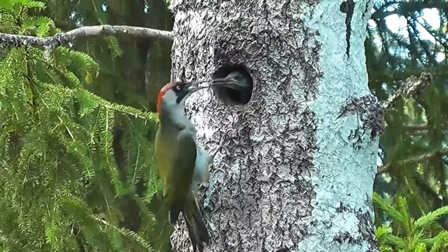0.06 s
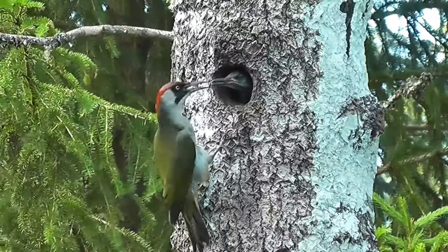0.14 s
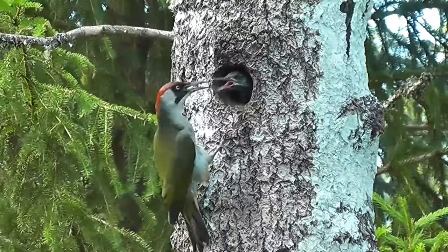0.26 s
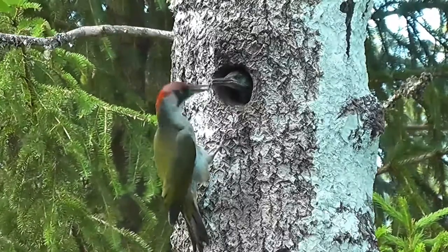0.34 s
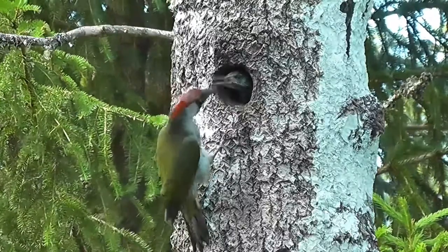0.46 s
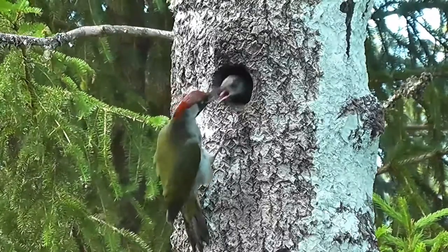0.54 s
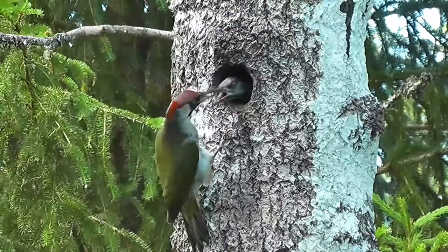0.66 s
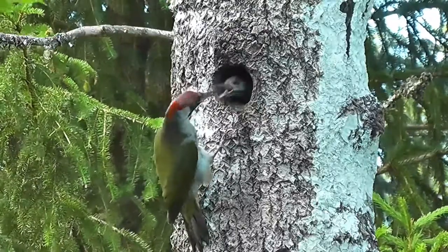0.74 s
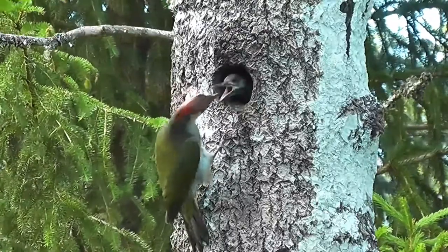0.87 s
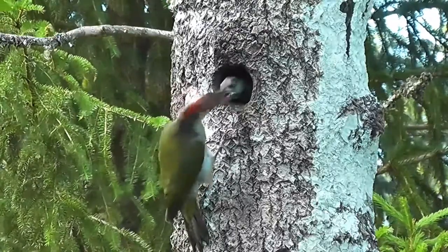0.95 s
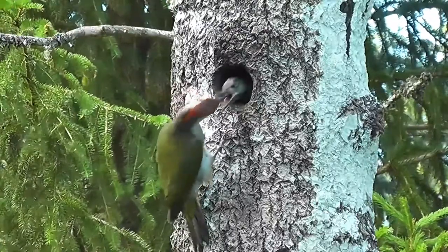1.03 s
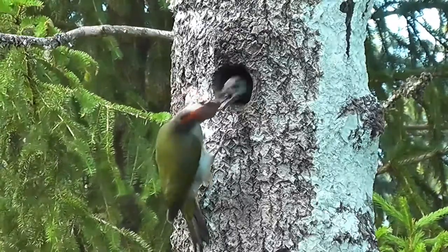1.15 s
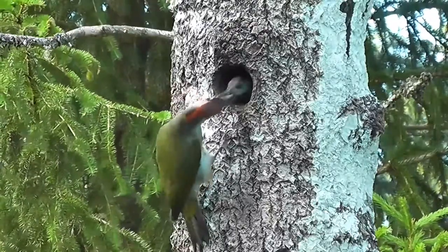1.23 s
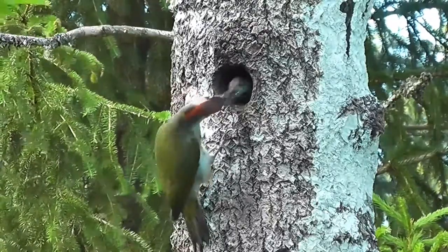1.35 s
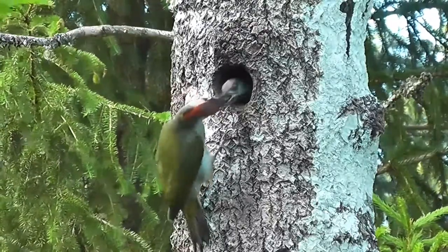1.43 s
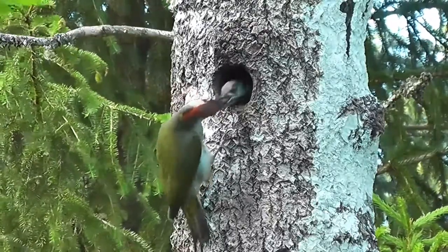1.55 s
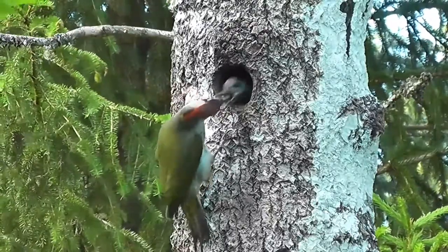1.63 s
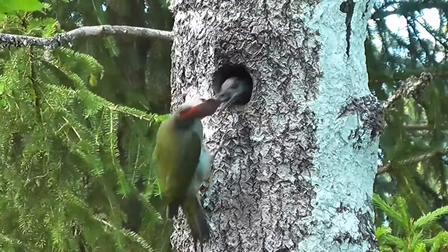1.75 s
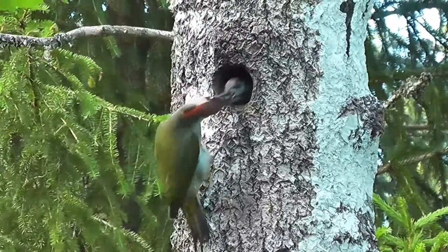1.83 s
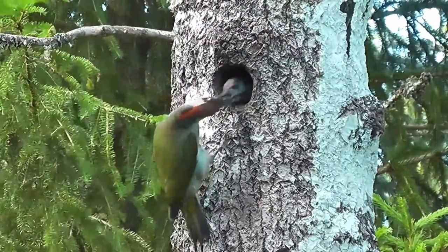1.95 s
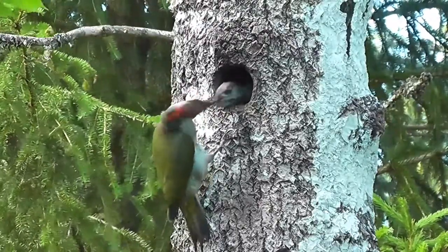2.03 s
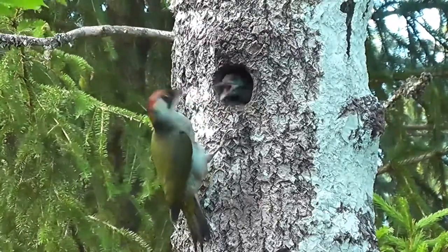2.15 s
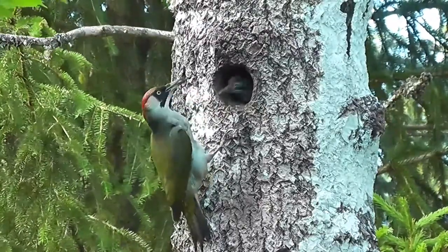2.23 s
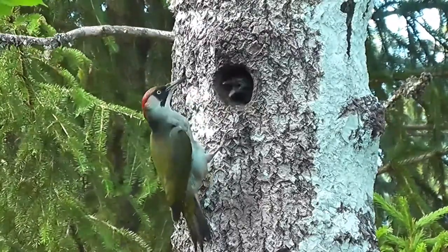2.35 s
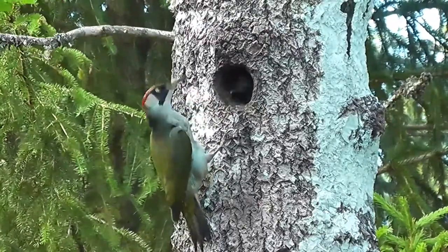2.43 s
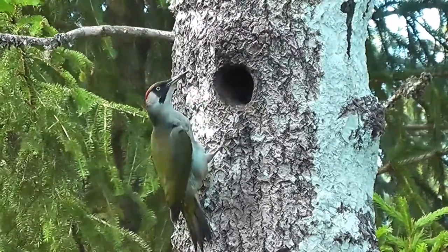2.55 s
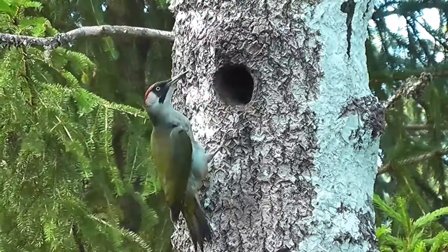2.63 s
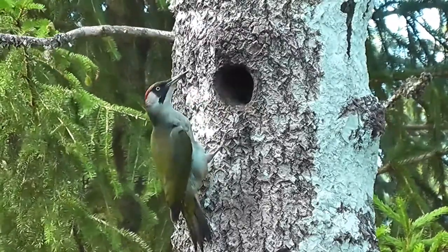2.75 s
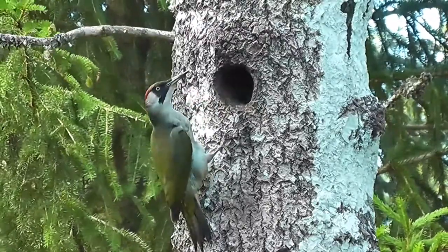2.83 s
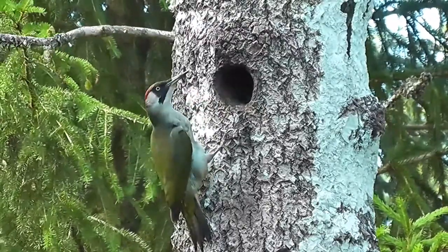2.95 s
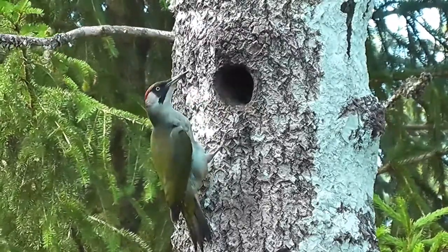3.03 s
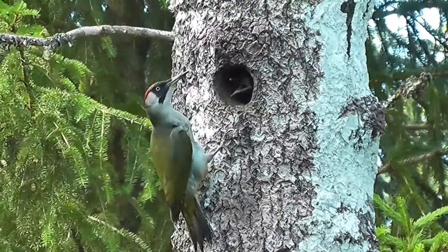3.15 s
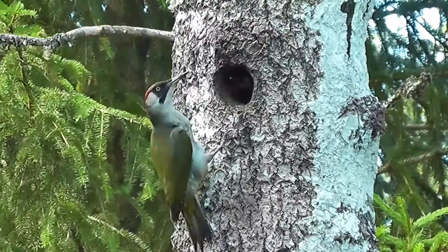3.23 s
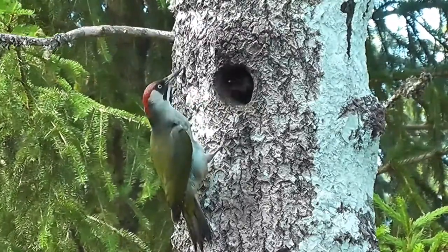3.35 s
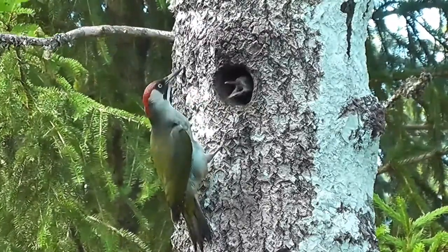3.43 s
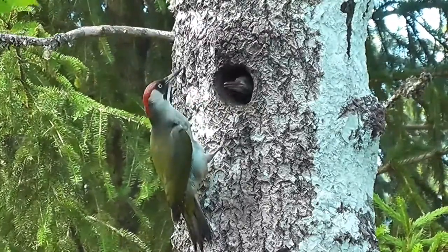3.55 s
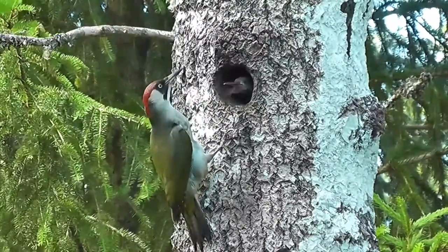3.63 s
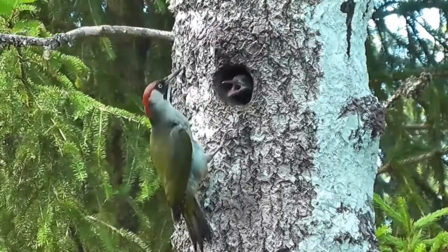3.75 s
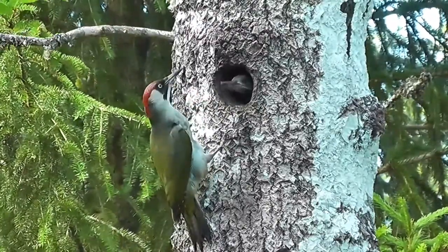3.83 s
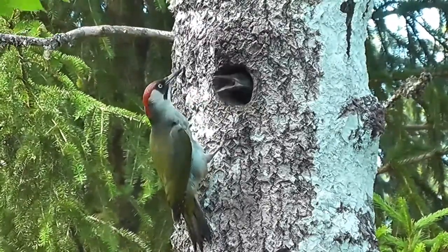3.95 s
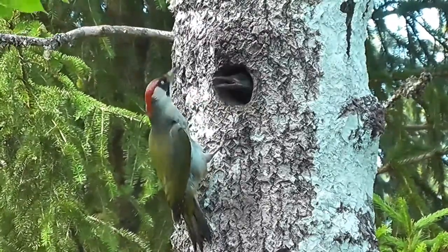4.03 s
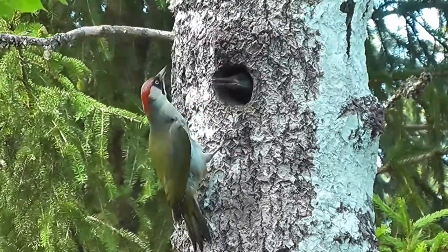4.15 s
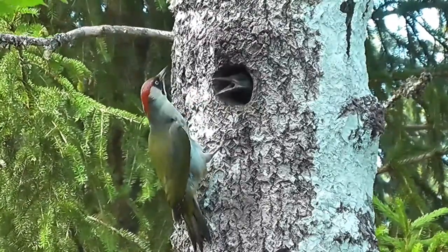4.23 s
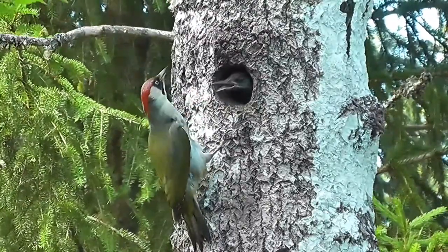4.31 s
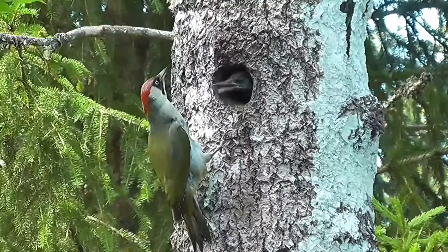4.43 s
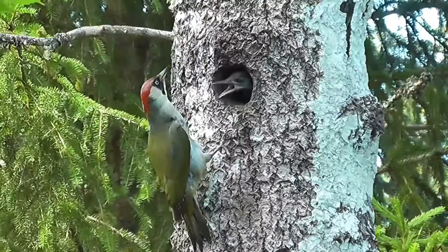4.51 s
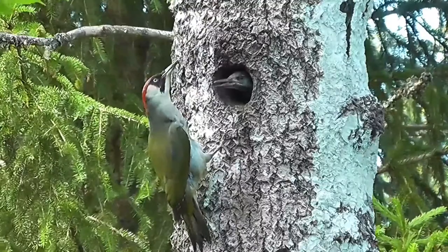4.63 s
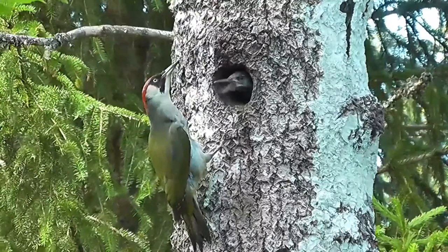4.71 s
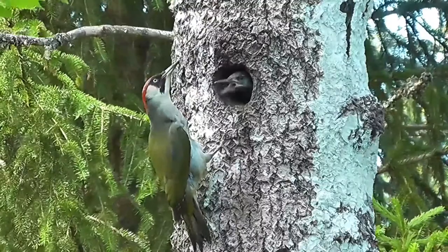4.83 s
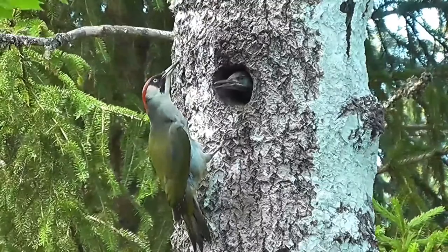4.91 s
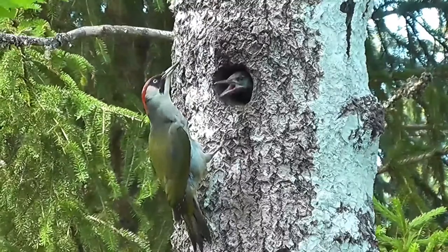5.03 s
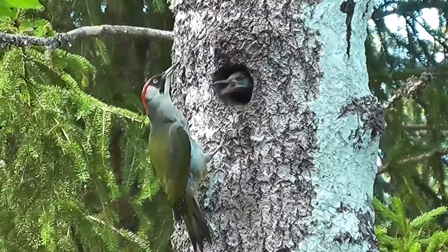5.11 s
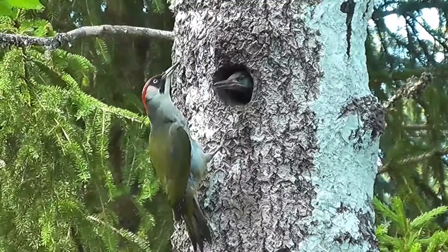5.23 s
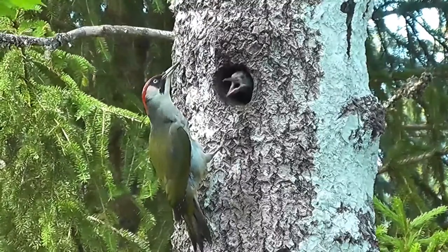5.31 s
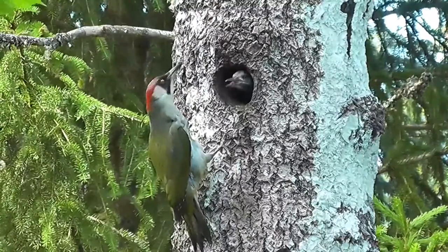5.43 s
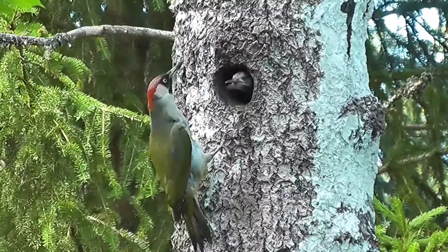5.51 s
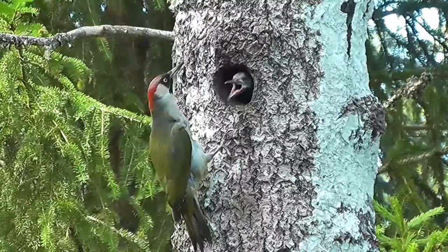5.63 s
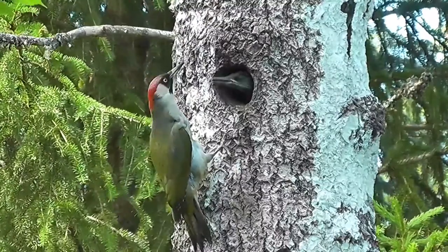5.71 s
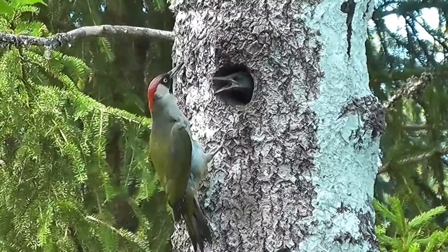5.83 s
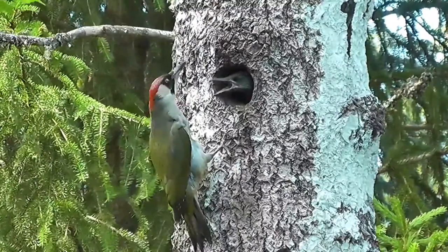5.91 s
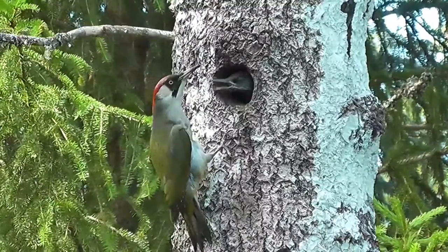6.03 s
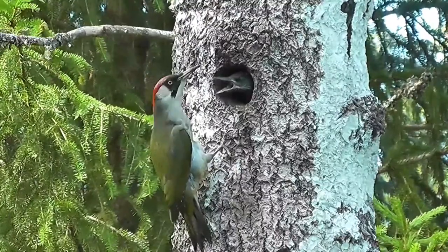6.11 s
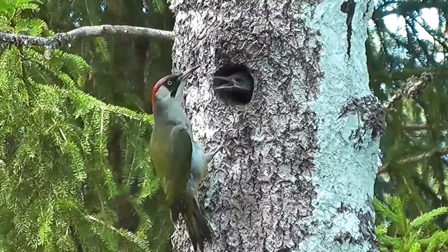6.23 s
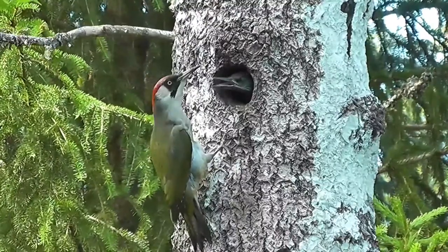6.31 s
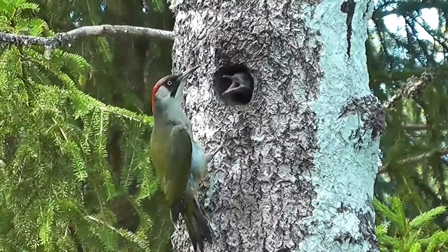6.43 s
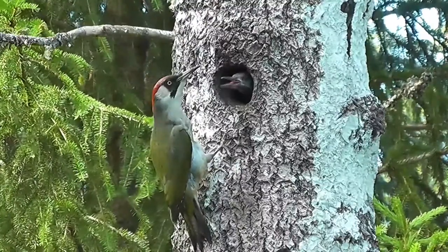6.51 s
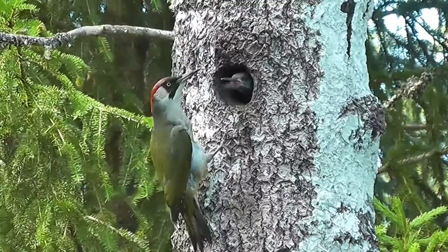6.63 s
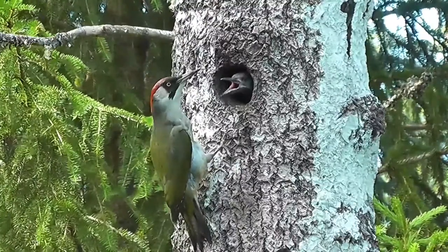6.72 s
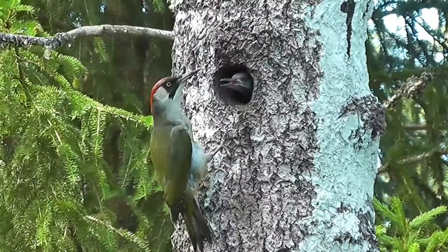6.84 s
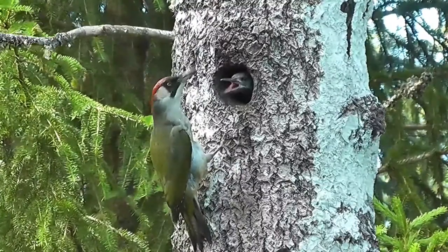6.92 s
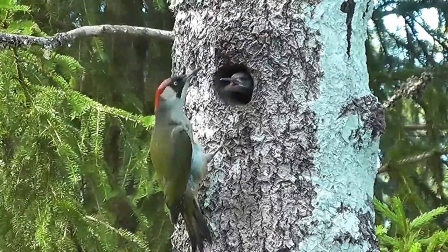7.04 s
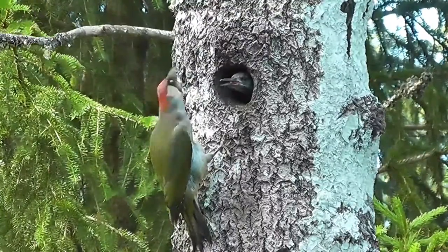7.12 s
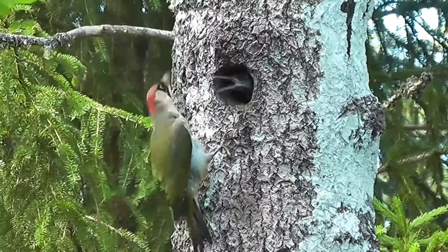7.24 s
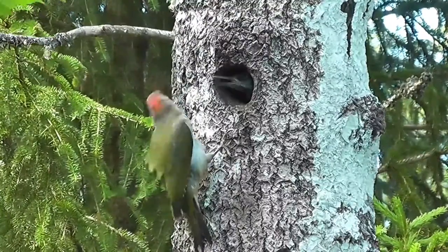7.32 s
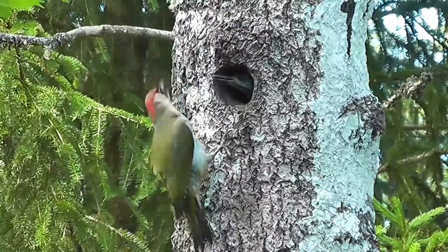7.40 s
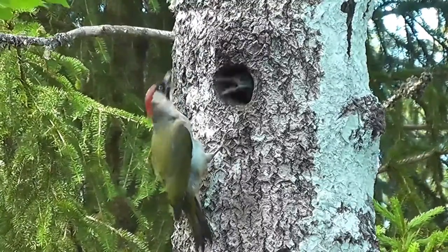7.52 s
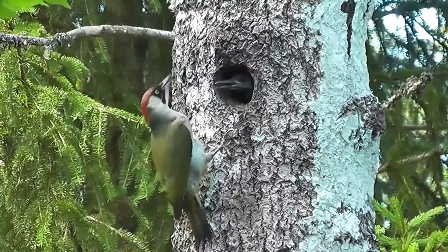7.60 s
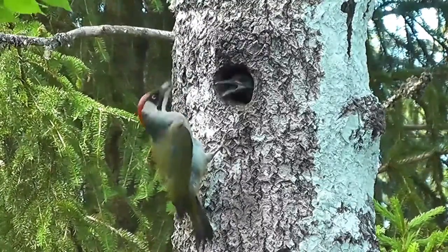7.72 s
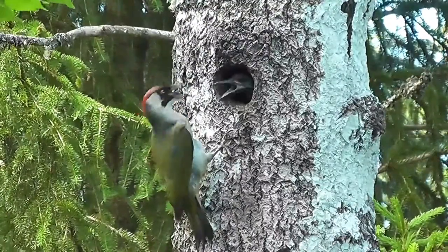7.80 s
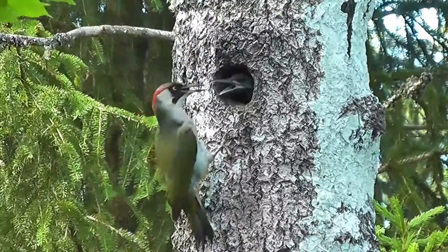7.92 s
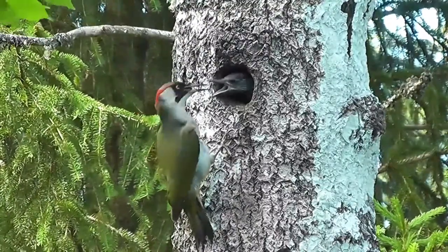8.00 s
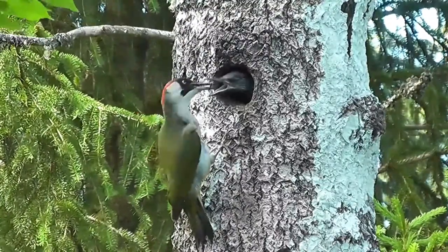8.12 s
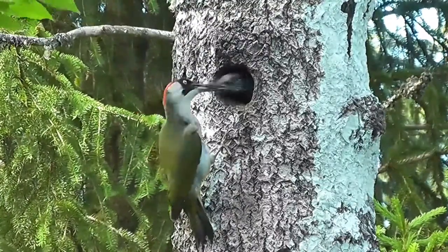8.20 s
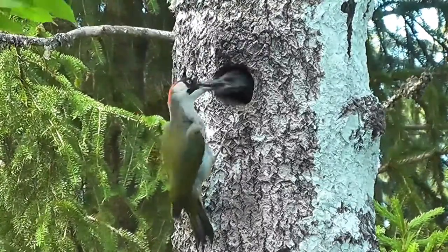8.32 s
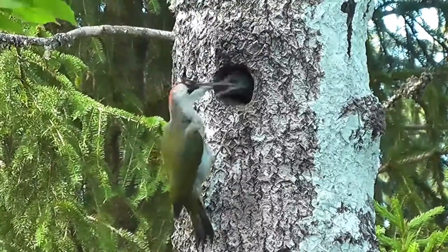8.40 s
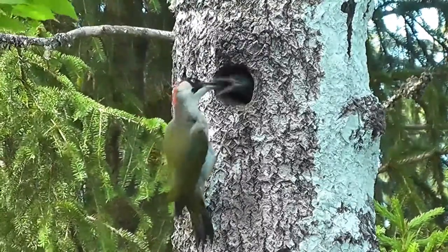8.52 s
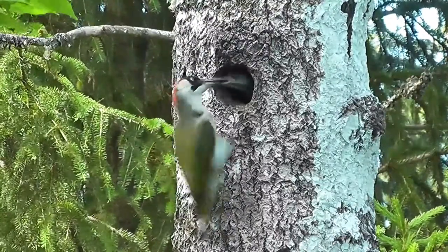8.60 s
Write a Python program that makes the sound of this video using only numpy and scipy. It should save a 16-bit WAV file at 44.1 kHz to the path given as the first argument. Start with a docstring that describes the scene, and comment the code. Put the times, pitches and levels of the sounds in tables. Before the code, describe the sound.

A woodpecker chick begs close by from a hollow tree trunk in a quiet forest. In the first second it gives four harsh calls, each a rough rasp that tightens into a short, falling squeak, with a brief echo from the trees. From about 1 to 2.6 seconds it makes only short, quiet, muffled grunts while being fed. Further off, a small bird gives five thin, very high whistles between 0.2 and 1.9 seconds. At 2.7 seconds the begging resumes and runs evenly at nearly four calls a second, loudest from 3.5 to 7 seconds, then a little weaker and rougher until the end, near 8.7 seconds. Three very faint chirps sound behind it at about 5.4, 6.2 and 7.4 seconds. A soft, even rush of air in distant trees and a faint low hum continue throughout.

```python
"""A green woodpecker nestling begs from its nest hole in a spruce trunk, over soft air and a faint hum.
Four calls open: each a rasp of uneven syrinx pulses that locks into a short, falling squeak, coloured by
the beak and the hollow trunk and echoed by the forest. The chick falls to muffled grunts while it is fed,
and small birds whistle further off. From 2.7 s it begs again, nearly four calls a second, with three
faint chirps behind it in the second half."""
import sys
import numpy as np
from scipy import signal
from scipy.fft import rfft, irfft, next_fast_len
from scipy.io import wavfile
from scipy.ndimage import uniform_filter1d

SR = 44100
rng = np.random.default_rng(int(sys.argv[2]) if len(sys.argv) > 2 else 0)


def put_to_file(sound):
    """Save the sound as 16-bit audio at rate SR, in the file named by the first command-line argument."""
    columns = np.atleast_2d(sound).T  # one column per channel
    safe = np.clip(columns, -1, 1)
    whole_steps = np.round(safe * 32767)
    wavfile.write(sys.argv[1], SR, whole_steps.astype(np.int16))


N = 381906
TIME = np.arange(N) / SR


def undb(db):
    """Decibels to gain."""
    return 10 ** (np.asarray(db) / 20)


def colour(points, hz):
    """Read an EQ curve on a log frequency axis."""
    f, db = np.transpose(points)
    return np.interp(np.log(hz + 1), np.log(f), db)


def bell(x, centre, width):
    """A Gaussian hump of height 1."""
    return np.exp(-.5 * ((x - centre) / width) ** 2)


def tint(x, db_of_hz):
    """EQ a sound by a gain in dB given as a function of frequency."""
    size = next_fast_len(x.shape[-1])
    gain = undb(db_of_hz(np.fft.rfftfreq(size, 1 / SR)))
    return irfft(rfft(x, size) * gain, size)[..., :x.shape[-1]]


def ringing(db, size):
    """The causal impulse response, of energy 1, with this spectral shape."""
    cepstrum = irfft(np.log(undb(db)))
    cepstrum[1:size // 2] *= 2
    cepstrum[size // 2 + 1:] = 0
    response = irfft(np.exp(rfft(cepstrum)))
    return response / np.linalg.norm(response)


def walk(rate):
    """Smooth random drift with a spread near 1."""
    hold = max(int(SR / rate), 2)
    return 1.2 * uniform_filter1d(np.repeat(rng.standard_normal(N // hold + 1), hold), hold)[:N]


def air(level_db=-54):
    """The bed: a soft, even rush of distant trees, wide in the low mids and narrow on top."""
    # Each row: frequency in Hz, relative level in dB.
    spectrum = [(10, -19.5), (28, -21.5), (50, -2.5), (80, -0.5), (115, -5), (200, -2.5), (350, -0.5),
                (600, -1), (1200, -9), (2850, -17.5), (3600, -12), (5700, -10.5), (10000, -22),
                (15500, -38)]
    # Each row: frequency in Hz, side minus mid in dB.
    width = [(40, -14.5), (130, 0), (350, -1), (700, -2.5), (1500, -1), (4000, -8.5), (12000, -38)]
    mid = tint(rng.standard_normal(N), lambda f: colour(spectrum, f))
    side = tint(rng.standard_normal(N), lambda f: colour(spectrum, f) + colour(width, f))
    return np.array([mid + side, mid - side]) / mid.std() * undb(level_db + .5 * walk(2.406))


def hum():
    """A faint far-off hum: low wavering sines, in opposite polarity left and right."""
    # Each row: pitch in Hz, level before panning in dB, pitch waver in Hz.
    tones = [(62.2, -58, 2.365), (100.2, -78, 0.38), (167.2, -65, 0.74)]
    out = np.zeros(N)
    for hz, db, waver_hz in tones:
        phase = 2 * np.pi * np.cumsum(hz + waver_hz * walk(20)) / SR
        out += np.sqrt(2) * np.sin(phase) * undb(db + 1.58 * walk(6))
    return out * np.array([[-.8], [1.05]])


def forest(x, wet_db, t60_s, late_db=-24, late_t60_s=1.0, build_s=0.00246):
    """Add echoes from the nearby trunks, then a faint long tail from the wood."""
    # Each row: frequency in Hz, reverb EQ in dB.
    echo_eq = [(500, 2), (1000, -2.5), (2000, -1.5), (3000, 2), (3450, 4), (3780, -1), (4150, -0.5),
               (4500, -6.5), (4780, 3.5), (5150, -1), (6100, 0.5), (8000, -3), (10000, -6), (15000, -8)]
    # Each row: frequency in Hz, side minus mid in dB.
    width = [(700, -3), (1300, -5), (2400, -7), (3800, -19), (5500, -18), (8000, -9), (12000, -3)]
    t = TIME[:SR]
    decay = (undb(-60 * t / t60_s) + undb(late_db - 60 * t / late_t60_s)) * (1 - np.exp(-t / build_s))
    noise = rng.standard_normal((2, SR))
    mid, side = tint(noise, lambda f: colour(echo_eq, f) + np.array([0 * f, colour(width, f)])) * decay
    response = np.array([mid + side, mid - side]) / np.linalg.norm(mid)
    return x + undb(wet_db) * signal.fftconvolve(x[None], response, axes=1)[:, :N]


def small_birds(waver=0.0068, flutter_db=3, chirp_s=0.057, chirp_hz=(2330, 2440, 3103)):
    """Nearly pure, trembling tones: thin whistles that arch and faint chirps that curl upward."""
    # Each row: start in seconds, length in seconds, opening pitch in Hz, top pitch in Hz, level in dB.
    whistles = [(0.201, 0.157, 7440, 8400, -47.5), (.505, 0.204, 6850, 8080, -45),
                (.9, .17, 6974, 8055, -46), (1.3, .22, 6866, 8220, -47), (1.745, 0.156, 6990, 7880, -52)]
    # Each row: start in seconds, level in dB.
    chirps = [(5.35, -68), (6.168, -60.5), (7.435, -63.5)]
    tremble, flutter = 1 + waver * walk(350), undb(flutter_db * walk(90))
    arches = [(start, length, .57, (start_hz, top_hz, .92 * top_hz), db)
              for start, length, start_hz, top_hz, db in whistles]
    curls = [(start, chirp_s, .5, chirp_hz, db) for start, db in chirps]
    out = np.zeros(N)
    for start, length, bend_at, pitches, db in arches + curls:
        span = slice(int(start * SR), int((start + length) * SR))
        contour = np.polyfit([0, bend_at, 1], pitches, 2)
        hz = np.polyval(contour, (TIME[span] - start) / length)
        tone = np.sqrt(2) * np.sin(2 * np.pi * np.cumsum(hz * tremble[span]) / SR)
        out[span] += undb(db) * tone * flutter[span] * np.hanning(len(hz)) ** 0.334
    return out


def wheeze(samples):
    """A dull breath of noise at rms 1."""
    breath_eq = [(500, -15.5), (900, 0.5), (1700, 0.5), (3000, -13), (12000, -13.5)]
    breath = tint(rng.standard_normal(samples), lambda f: colour(breath_eq, f))
    return breath / np.sqrt(np.mean(breath ** 2))


def syrinx(hz, rough, jitter=.12, scatter_db=3.5, max_cycles=256, half_taps=8):
    """One sharp pulse a cycle; roughness scatters their spacing and strength."""
    chance = rng.standard_normal((max_cycles, 2))
    phase = np.cumsum(hz) / SR
    cycles = min(int(phase[-1]), max_cycles)
    at = np.interp(np.arange(cycles), phase, np.arange(len(hz)))
    loose, period = rough[at.astype(int)], SR / hz[at.astype(int)]
    at = at + np.cumsum(jitter * loose * period * chance[:cycles, 0])
    strength = undb(scatter_db * loose * np.clip(chance[:cycles, 1], -2, 2))
    # hold the power steady across pitch and scatter
    strength *= np.sqrt(period) / np.exp(np.log(undb(scatter_db * loose)) ** 2)
    taps = at.astype(int)[:, None] + np.arange(1 - half_taps, half_taps + 1)
    offset = taps - at[:, None]
    pulses = np.zeros(len(hz))
    np.add.at(pulses, taps % len(hz), strength[:, None] * np.sinc(offset) * np.sinc(offset / half_taps))
    return pulses


def tract(source, beak_hz, beak_db, gape_db, throat_db, mouth_db, sheen_db, beak_width_hz, mouth_hz):
    """Throat, mouth and beak resonances heard through the nest hole; a wide gape lets the treble out."""
    # The voice with a half-open beak. Each row: frequency in Hz, gain in dB.
    voice_eq = [(300, -39), (650, -12.5), (860, -5.5), (1150, -5.5), (1500, -9), (1950, -6.5), (2300, -7),
                (2950, -7.5), (3600, 0), (5800, -2), (6450, -1.5), (7200, -3), (9500, -6), (15000, -29.5)]
    # Peaks and dips of the nest hole. Each row: centre in Hz, width in Hz, gain in dB.
    nest_hole = [(976.5, 51.5, -6.5), (2660, 123, -3.5), (3134, 364, -3.5), (3838, 176, 3), (4490.5, 98, 4),
                 (5254, 65, 4), (5646, 69, 2), (6050, 114, -0.5), (6451, 346, 4), (7010, 335, -2.5),
                 (8153, 476, 3), (9840, 155, -5)]
    size = 1024
    f = np.fft.rfftfreq(size, 1 / SR)
    beak = beak_db / (1 + ((f - beak_hz) / beak_width_hz) ** 2)
    mouth = throat_db * bell(f, 811, 245) + mouth_db * bell(f, 1713, 942) + 5 * bell(f, mouth_hz, 103.8)
    # a narrow gape darkens the middle treble but lets the beak's second resonance ring
    overtone = -.35 * min(gape_db, 0) * (bell(f, 9670, 590) - bell(f, 8490, 710))
    treble = gape_db * bell(f, 6634, 1356) + sheen_db * bell(f, 12090, 2410) + overtone
    hollow = sum(db * bell(f, hz, width / 2) for hz, width, db in nest_hole)
    response = ringing(colour(voice_eq, f) + beak + mouth + treble + hollow, size)
    return signal.fftconvolve(source, response)[:len(source)]


def follow(x, hz, width_hz=244):
    """A resonance of gain 1 whose centre glides."""
    turn, pole = np.exp(2j * np.pi * np.cumsum(hz) / SR), np.exp(-np.pi * width_hz / SR)
    return 2 * np.real(turn * signal.lfilter([1 - pole], [1, -pole], x / turn))


def beak_ring(voice, hz, partial, purity, weight):
    """The beak tracks one partial and rings on it, less on the one below; weighted power ends up 1."""
    ring = undb(4) * follow(voice, partial * hz) + undb(-9.5) * follow(voice, (partial - 1) * hz)
    voice = voice + purity * ring
    return voice / np.sqrt(np.average(voice ** 2, weights=weight))


def call(start, peak, end, pitch_hz, squeak_rough, rasp_db, squeak_db,
         beak_hz, beak_db, gape_db, throat_db, mouth_db, sheen_db):
    """A rasp swells, locks into a tone as far as its roughness allows, then sags and frays."""
    # Each row: time from the squeak in seconds, pitch as a ratio of the base pitch.
    pitch_fall = [(-.1, 1), (-.014, 1.062), (0, 0.988), (.01, 0.956), (.02, 0.78), (.036, 0.84)]
    span = slice(max(int((start - .05) * SR), 0), int((end + .05) * SR))
    t = TIME[span]
    locked = .5 + .5 * np.tanh((t - peak + 0.010293) / 0.00278)
    fraying = np.interp(t - peak, [.014, .038], [.03, .36])
    rough = 1 + locked * (np.clip(squeak_rough + fraying, .03, 1) ** 1.3 - 1)
    hz = pitch_hz * np.interp(t - peak, *np.transpose(pitch_fall))
    hiss = (.1 + .66 * rough) * rng.standard_normal(len(t))
    source = (syrinx(hz, rough) + hiss) / np.sqrt(1 + hiss.var())

    # the mouth resonance climbs as the beak opens
    opening = tract(source, beak_hz, beak_db, gape_db - 4, throat_db + 1.5, mouth_db, sheen_db,
                    beak_width_hz=517, mouth_hz=1646)
    rasp = tract(source, beak_hz, beak_db, gape_db, throat_db - 2.5, mouth_db - .3, sheen_db,
                 beak_width_hz=455.5, mouth_hz=1841)
    # in the squeak the beak resonance sinks and sharpens; a narrow gape brings out the low partials
    sunk_hz, low_db = 0.942 * beak_hz, -.45 * min(gape_db, 0)
    squeak = tract(source, sunk_hz, .5 * beak_db + 3, gape_db - .5, throat_db + 3.5 + low_db,
                   mouth_db - 1.5 + low_db, sheen_db - 1.5, beak_width_hz=344, mouth_hz=2010)
    purity = max(1 - squeak_rough / .55, 0)
    squeak = beak_ring(squeak, hz, np.round(sunk_hz / pitch_hz), purity, weight=bell(t, peak, 0.0104))
    opened = np.interp(t, [start, peak - .025], [0, 1])
    voice = (1 - locked) * ((1 - opened) * opening + opened * rasp) + locked * squeak

    # air pressure builds through the rasp, surges in the squeak and drops away
    swell_db = np.interp(t, [start, (start + peak) / 2, peak, end], [-0.14, 0.376, 1.196, -1.2])
    build_up = np.interp(t, [start, peak - .02, peak], [-.2, .12, 0])
    surge_db = (squeak_db - rasp_db) * (bell(t, peak + 0.00163, 0.0118) + build_up)
    gate = (1 + np.tanh((t - start + 0.00143) / 0.009)) * (1 - np.tanh((t - end) / 0.009)) / 4
    lead_in = undb(-18) * bell(t, start - .008, 0.00977) * wheeze(len(t))
    out = np.zeros(N)
    out[span] = (voice * gate * undb(swell_db + surge_db - 0.18) + lead_in) * undb(rasp_db)
    return out


def grunting(release_s=0.01215, surge_db=2.2):
    """Short, wholly rough calls through a full mouth, pushed hardest just before they stop."""
    # Each row: start in seconds, length in seconds, base level in dB.
    grunts = [(0.721, .032, -40), (1.171, .045, -51.5), (1.302, .043, -53), (1.53, 0.0606, -44.5),
              (1.788, 0.0525, -49), (2.012, 0.0476, -53.5), (2.076, 0.0226, -53.5), (2.296, .02, -49),
              (2.34, 0.024, -51.5), (2.494, 0.0635, -44), (2.601, 0.0185, -50.5)]
    out = np.zeros(N)
    for start, length, db in grunts:
        end = start + length
        out += call(start, end - release_s, end, pitch_hz=838.3, squeak_rough=1,
                    rasp_db=db, squeak_db=db + surge_db, beak_hz=4710, beak_db=8,
                    gape_db=-2.5, throat_db=3, mouth_db=14, sheen_db=-0.5)
    return out


def begging(hard_push_db=-24, soft_rasp_db=-37):
    """Each call takes its colour from the pose of the beak and its purity from the push."""
    # Each row: start, squeak and end in seconds, base pitch in Hz, rasp and squeak drive in dB.
    begs = [(0.034, .137, .167, 829.7, -35.5, -30.5), (.319, .408, .44, 789.5, -36.5, -30),
            (.622, .7, .745, 789.8, -39, -36), (.888, 1.004, 1.03, 855.8, -34.5, -30),
            (2.746, 2.822, 2.85, 818.8, -42, -38.5), (3.001, 3.083, 3.11, 821, -39.5, -29),
            (3.263, 3.352, 3.375, 983.8, -34, -27.5), (3.516, 3.612, 3.638, 933.6, -30.5, -25),
            (3.785, 3.883, 3.914, 967.9, -30.5, -25), (4.055, 4.145, 4.17, 869.7, -32, -25),
            (4.324, 4.409, 4.437, 912.8, -33, -24.5), (4.594, 4.683, 4.715, 849.6, -33.5, -24),
            (4.863, 4.95, 4.984, 876.7, -31.5, -23.5), (5.159, 5.231, 5.264, 813.5, -35, -26),
            (5.428, 5.511, 5.537, 782.1, -32, -26.5), (5.681, 5.78, 5.808, 807.2, -30, -24.5),
            (5.959, 6.056, 6.082, 868.5, -32, -24), (6.229, 6.327, 6.356, 898.9, -34.5, -25),
            (6.499, 6.592, 6.618, 848.9, -33, -26.5), (6.793, 6.881, 6.91, 814.8, -37.5, -26.5),
            (7.05, 7.15, 7.177, 867.4, -37.5, -27), (7.312, 7.414, 7.44, 861.4, -34.5, -31.5),
            (7.596, 7.685, 7.705, 935.3, -34, -32.5), (7.851, 7.957, 7.974, 948.5, -34, -28),
            (8.098, 8.22, 8.24, 984.9, -34.5, -31.5), (8.366, 8.456, 8.472, 937.3, -34.5, -34.5),
            (8.636, 8.714, 8.74, 931.4, -35.5, -34.5)]
    # Each row: time in seconds, beak resonance in Hz, then its boost, gape brightness and throat in dB.
    beak_poses = [(.42, 4250, -1.5, -0.5, 4), (.65, 5600, 4, 3, -1), (1.03, 5700, -4, -1.5, -1.5),
                  (2.8, 4460, 9, 5, -6.5), (3.05, 4699, 9, 0.5, -10), (3.31, 4467, 7, -1.5, -1),
                  (3.57, 3980, 2.5, 3.5, 0.5), (3.85, 4130, 0, 2.5, 3), (4.09, 4644, 12.5, -4, -2.5),
                  (4.38, 4530, 8.5, -3, -3), (4.64, 5370, 1, 2.5, -2.5), (5.2, 5349, 3, 4.5, 1.5),
                  (5.46, 4836, 11.5, 2, 2.5), (5.75, 5057, 11.5, 2.5, 4), (6.0, 4642, 14, -4, -1),
                  (6.28, 4653, 3.5, -2.5, -2.5), (6.54, 5220, 4, 2.5, -2), (7.11, 5190, 6.5, 1.5, -2),
                  (7.35, 4565, 12.5, -9, -12), (8.15, 4682, 7.5, -6, -8.5), (8.65, 4586, 12.5, -11.5, -2.5)]
    # Each row: time in seconds, gain of the top treble in dB.
    sheen = [(.1, 2.5), (1, 2.5), (2.8, 10), (3.3, 7.5), (3.55, 1), (4.1, 4.5), (4.9, 1.5), (5.9, 6),
             (6.55, 2.5), (7.95, 4.5), (8.15, -0.5), (8.65, -11)]
    pose_s, *pose = np.transpose(beak_poses)
    out = np.zeros(N)
    for start, peak, end, pitch_hz, rasp_db, squeak_db in begs:
        middle = (start + peak) / 2
        beak_hz, beak_db, gape_db, throat_db = (np.interp(middle, pose_s, column) for column in pose)
        rough = .15 + .03 * (hard_push_db - squeak_db)  # a weak push stays rough
        mouth_db = 1.23 + 1.92 * max(soft_rasp_db - rasp_db, 0)  # the mouth stands out in a soft rasp
        sheen_db = np.interp(middle, *np.transpose(sheen))
        out += call(start, peak, end, pitch_hz, rough, rasp_db, squeak_db,
                    beak_hz, beak_db, gape_db, throat_db, mouth_db, sheen_db)
    return out


def scene():
    """The chick close by, the small birds deeper in the wood, air and hum underneath."""
    chick = forest(begging() + grunting(), wet_db=-11.5, t60_s=0.262)
    birds = forest(small_birds(), wet_db=-6, t60_s=0.293)
    return chick + birds + air() + hum()


def record(dry, top_hz=15200):
    """Two microphones, slightly apart in colour and phase, then a steep high cut."""
    # Each row: frequency in Hz, left minus right in dB.
    lean = [(60, -3.5), (200, -1.5), (380, -2.5), (700, 2.5), (1300, 2.67), (2400, 0), (4400, -0.7),
            (8100, -0.36), (15000, 2)]
    # Each row: frequency in Hz, phase lead of the left microphone in radians.
    lead = [(300, 0), (750, .55), (1600, 0), (5000, 0), (13000, .15)]
    sides, f = np.array([[.5], [-.5]]), np.fft.rfftfreq(N, 1 / SR)
    response = undb(sides * colour(lean, f)) * np.exp(1j * sides * colour(lead, f))
    pair = irfft(rfft(dry) * response, N)
    return signal.sosfilt(signal.ellip(8, .2, 70, top_hz, fs=SR, output="sos"), pair)


dry = scene()
out = record(dry)
put_to_file(out)
```